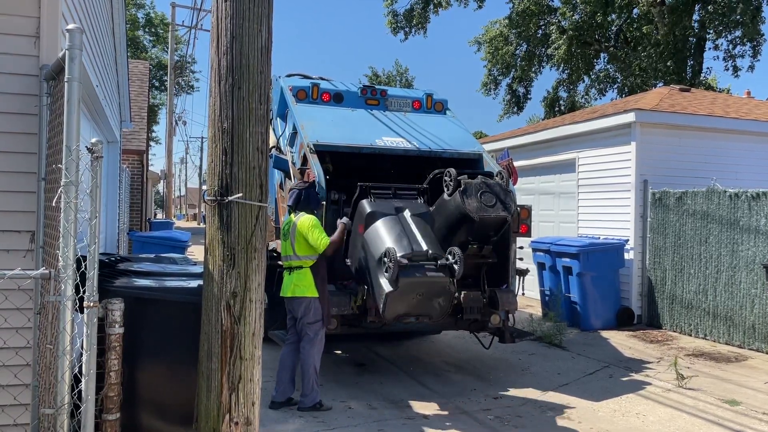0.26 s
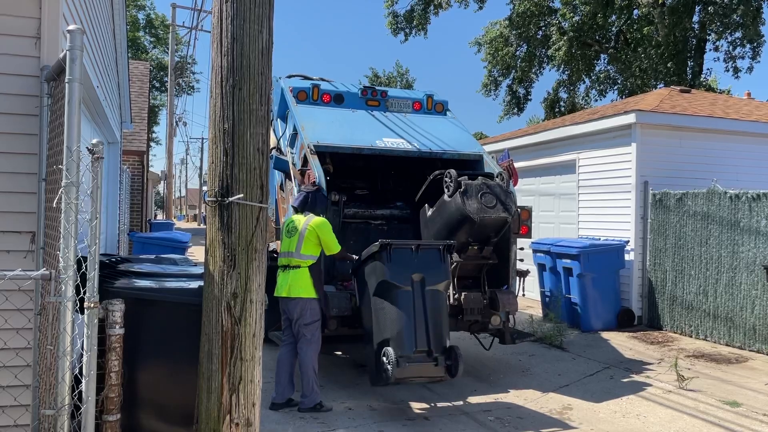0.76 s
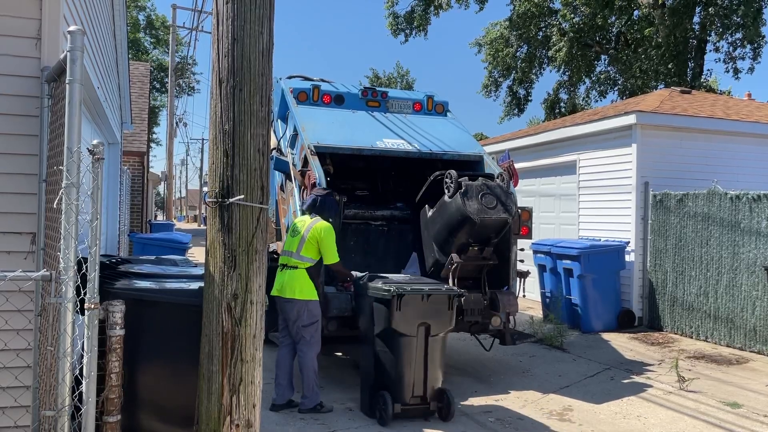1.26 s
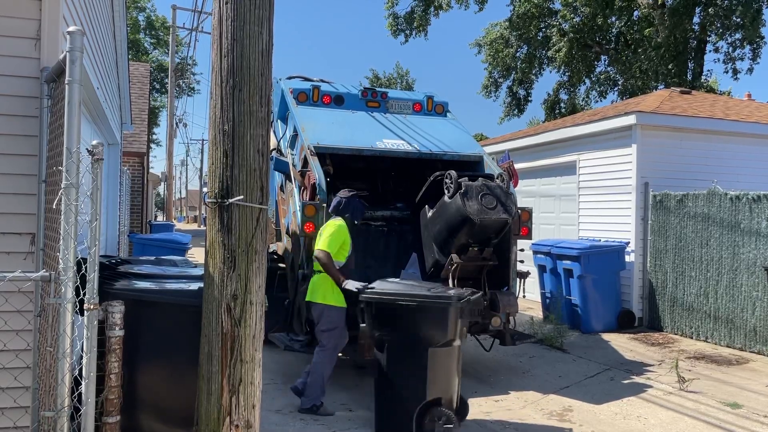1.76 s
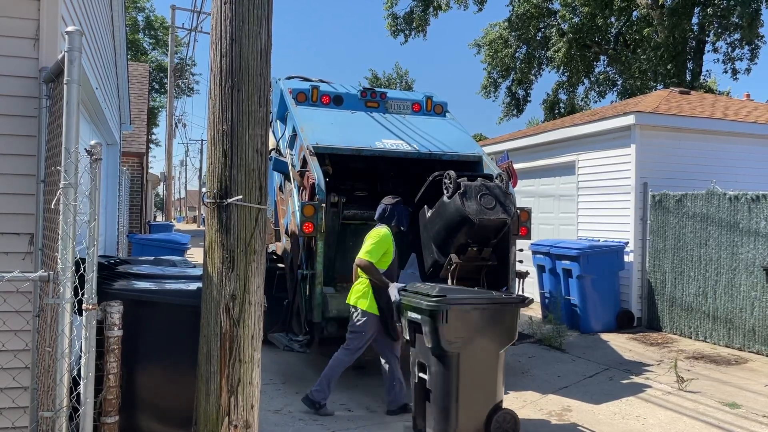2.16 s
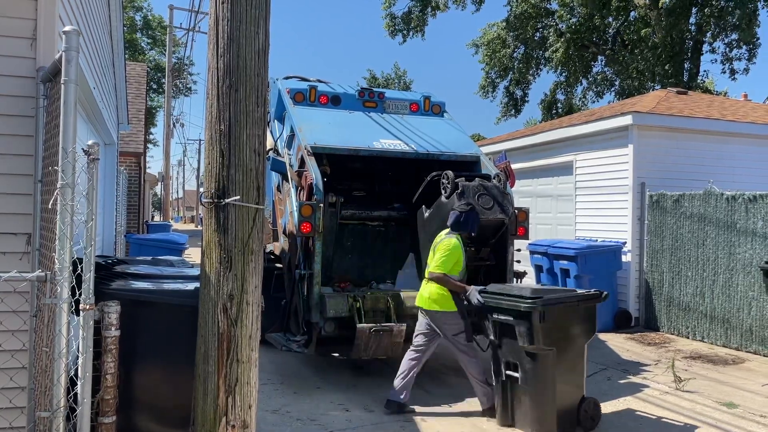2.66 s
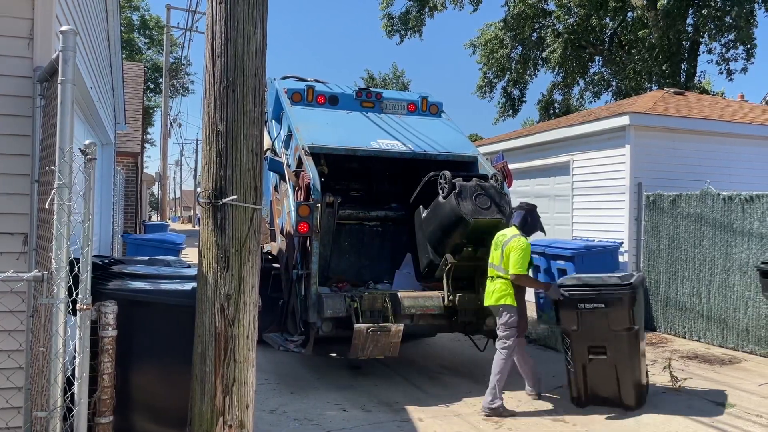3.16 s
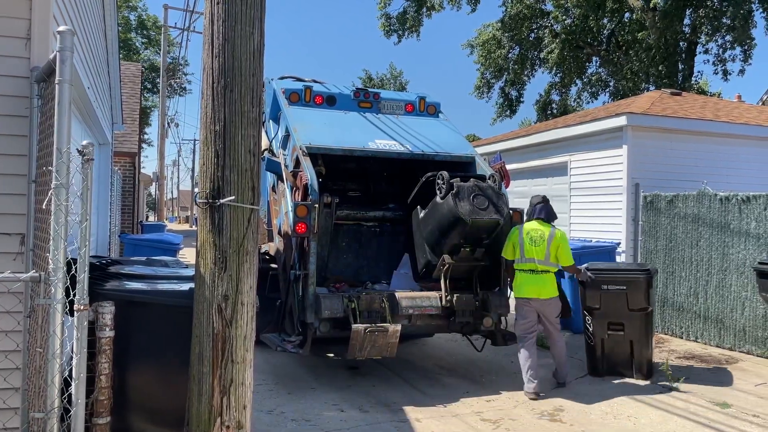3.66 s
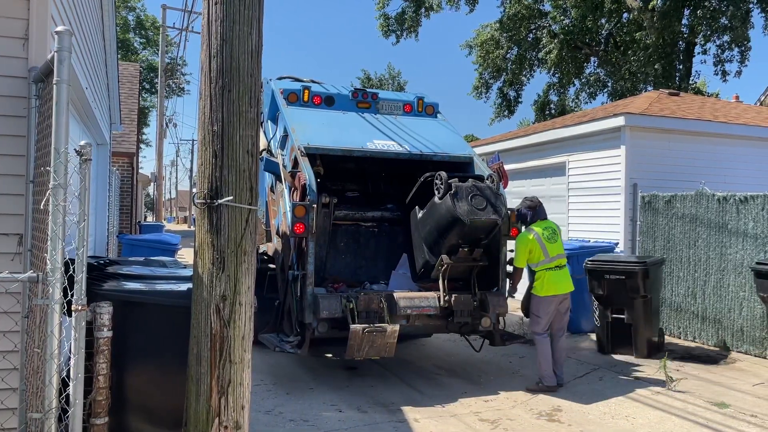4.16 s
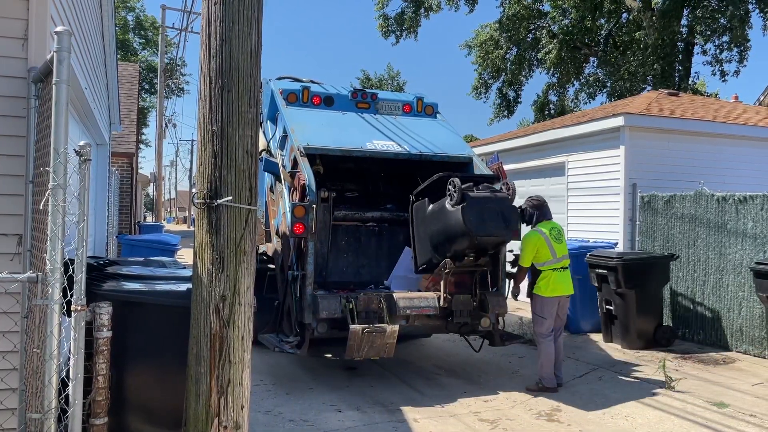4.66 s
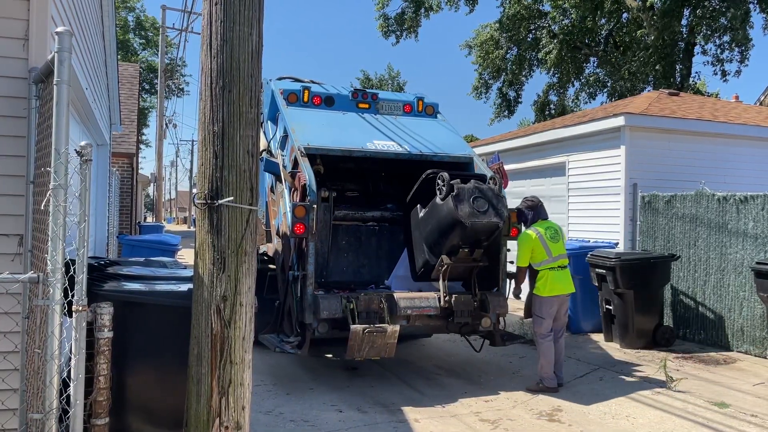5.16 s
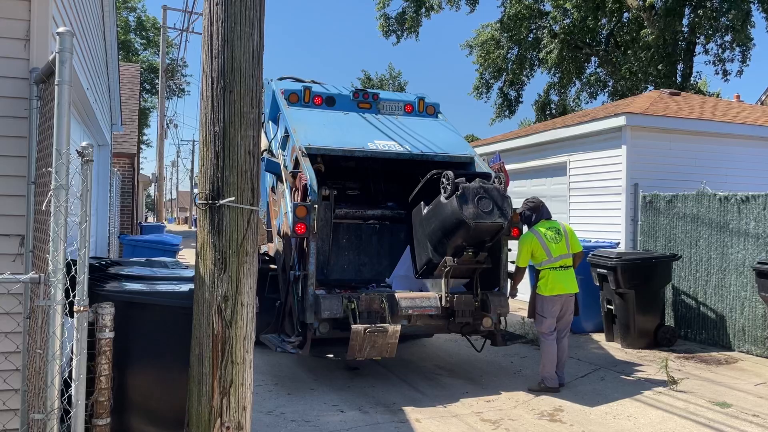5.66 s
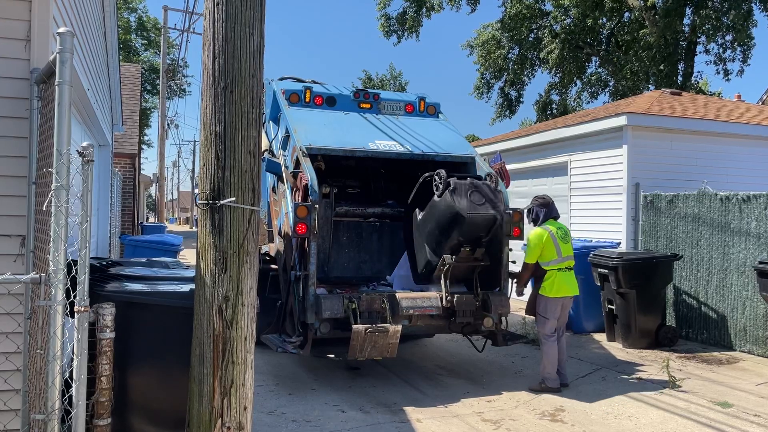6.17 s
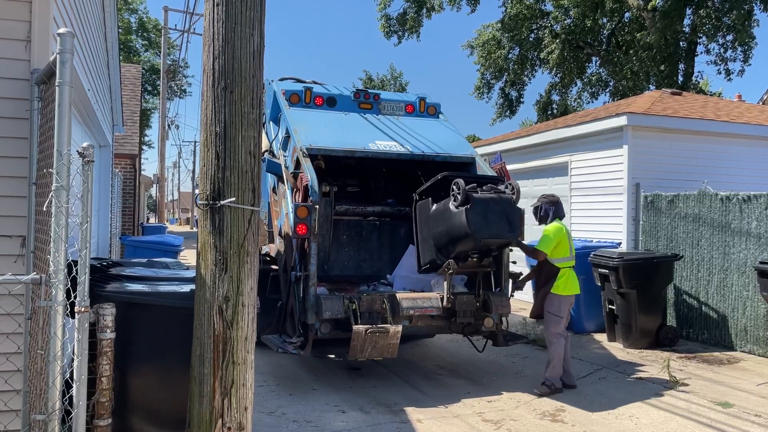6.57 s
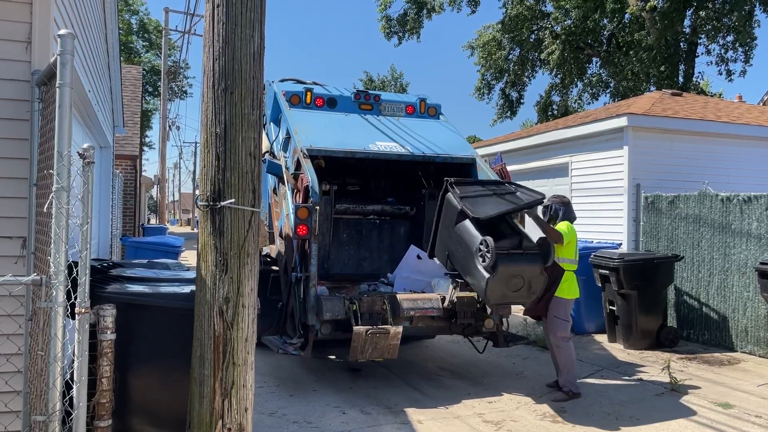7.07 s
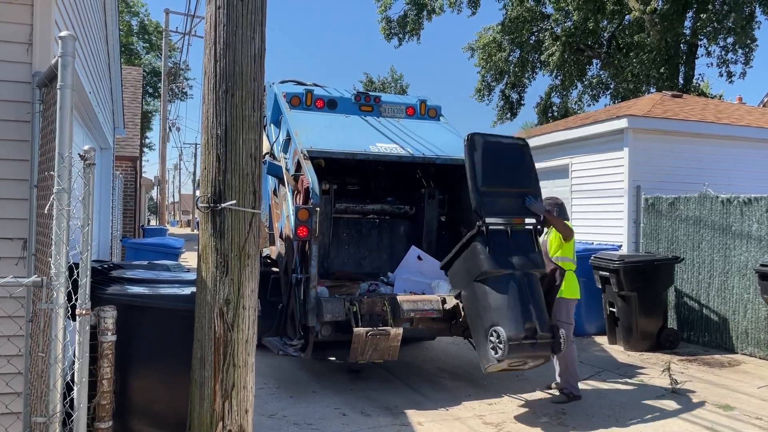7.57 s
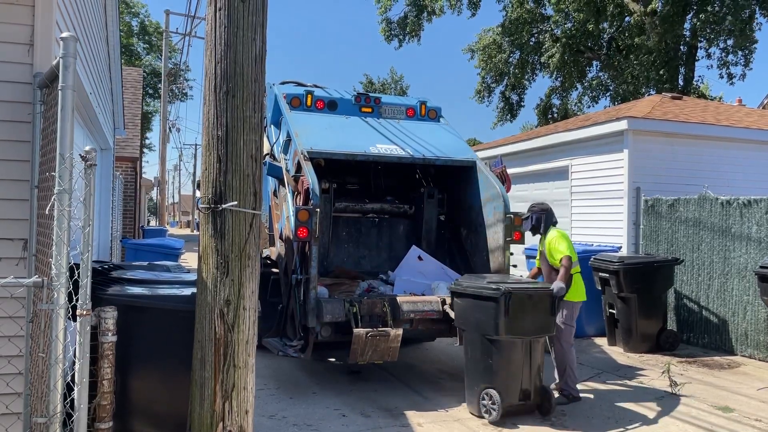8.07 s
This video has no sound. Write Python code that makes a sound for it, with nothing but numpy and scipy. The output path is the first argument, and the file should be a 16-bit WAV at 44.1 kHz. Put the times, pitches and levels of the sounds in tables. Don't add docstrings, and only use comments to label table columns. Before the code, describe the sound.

Outdoors between walls, a low puffing engine runs under oil hiss and a faint pump whine. Hollow tub knocks and a sharp clank come first, then wheels rumble, scrape and tick over rough ground with a thin hinge squeak. Denser metallic banging and booming thumps follow as another bin is shaken, then a brief lull, a low rising whine and a final double slam. Stereo microphone at moderate distance, slightly compressed on loud hits.

```python
import sys
import numpy as np
from scipy import signal
from scipy.fft import rfft, irfft, next_fast_len
from scipy.io import wavfile
from scipy.ndimage import uniform_filter1d

SR = 44100
rng = np.random.default_rng(int(sys.argv[2]) if len(sys.argv) > 2 else 0)


def attenuation_scalar(level_db):
    decades = np.asarray(level_db, float) / 20
    return 10 ** decades


def wav_record(signal):
    frames = np.transpose(np.atleast_2d(signal))
    bounded = np.clip(frames, -1, 1)
    quanta = np.round(bounded * 32767).astype(np.int16)
    wavfile.write(sys.argv[1], SR, quanta)


N = 367000
TIME = np.arange(N) / SR


def evened(x):
    return x / np.sqrt(np.mean(x ** 2) + 1e-20)


def read(points, hz):
    f, value = np.transpose(points)
    return np.interp(np.log(hz + 1), np.log(f + 1), value)


def colour(x, points, closed=False):
    n = next_fast_len(x.shape[-1])
    hz = np.fft.rfftfreq(n, 1 / SR)
    inside = (hz > points[0][0]) & (hz < points[-1][0]) if closed else 1
    return irfft(rfft(x, n) * attenuation_scalar(read(points, hz)) * inside, n)[..., :x.shape[-1]]


def resonate(x, hz, width):
    r = np.exp(-np.pi * width / SR)
    return 2 * signal.lfilter([1 - r], [1, -r * np.exp(2j * np.pi * hz / SR)], x).real


def body(x, modes):
    return sum(attenuation_scalar(db) * resonate(resonate(x, hz, width), hz, width) for hz, width, db in modes)


def lumps(seconds, depth_db):
    size = max(int(seconds * SR), 2)
    slow = uniform_filter1d(uniform_filter1d(rng.standard_normal(N), size), size)
    return attenuation_scalar(depth_db * evened(slow))


def patchy(x, depth_db):
    hz, t, z = signal.stft(x, SR, nperseg=512)
    patches = uniform_filter1d(rng.standard_normal(z.shape), size=5, axis=0)
    patches = uniform_filter1d(patches, size=6, axis=1)
    return signal.istft(z * attenuation_scalar(depth_db * evened(patches)), SR, nperseg=512)[1][:N]


def curve(rows):
    s, *columns = np.transpose(rows)
    return [np.interp(TIME, s, c) for c in columns]


def knocking(per_s, spread_db, fall, length):
    hits = attenuation_scalar(spread_db * np.minimum(rng.exponential(1, N), 5)) * (rng.random(N) < per_s / SR)
    return evened(signal.oaconvolve(hits, np.exp(-TIME[:length] / fall))[:N])


def rattle(per_s, spread_db, fall, steady):
    return (steady + knocking(per_s, spread_db, fall, 900)) * rng.standard_normal(N)


def blows(s, db, t60, rise):
    out, t = np.zeros(N + SR), TIME[:SR // 3]
    for at, level_db, fall in zip(s, db, np.clip(t60, .008, .8)):
        slower = attenuation_scalar(0.56 * (np.max(db) - level_db))
        front = 1 - np.exp(-t / (rise * slower))
        out[round(at * SR):][:len(t)] += attenuation_scalar(level_db - 60 * t / fall) * front
    return out[:N]


# [t/s, roar level/dB]
LOAD = [(0.0, -17), (0.12, -29), (0.35, -34), (1.0, -33), (1.3, -44), (1.5, -30.5), (1.65, -29.5),
        (2.0, -42), (2.45, -35), (3.26, -31), (4.0, -37.5), (4.66, -22.5), (5.0, -34), (5.17, -23.5),
        (5.45, -34), (6.28, -21.5), (6.8, -29.5), (8.32, -31.5)]
# [t/s, length/s, hiss level/dB, fizz level/dB re hiss]
SLIDES = [(1.35, 0.28, -40.5, -11), (1.48, 0.66, -39.5, -13), (2.54, 0.34, -36.5, -11),
          (3.708, 0.65, -35, -13.5), (4.144, 0.36, -32, -7), (4.552, 0.34, -34.5, -9),
          (4.958, 0.29, -28.5, -8), (5.1, 0.38, -33, -9), (8.203, 0.3, -38.5, -4.5), (6.33, 2.7, -38.5, -8),
          (2.33, .3, -45, -6), (5.7, 0.7, -42, -18), (3.358, 0.16, -45, -15)]


def rush(idle_db, share):
    idle_roar_db, hiss_per_load = -38.5, 0.16
    rise, fall = 0.085, 0.37
    power = attenuation_scalar(2 * (idle_db + hiss_per_load * (curve(LOAD)[0] - idle_roar_db)))
    for s, length, db, fizz_db in SLIDES:
        u = (TIME - s) / length
        shape = np.clip(np.minimum(u / rise, (1 - u) / fall), 0, 1)
        power = power + attenuation_scalar(2 * (db + share * fizz_db)) * shape ** 2
    return np.sqrt(power)


IDLE_HISS_DB, IDLE_FIZZ_DB = -40, -51.5
# [f/Hz, level/dB per Hz]
ROAR = [(30, -24), (60, 14.5), (85, 8), (125, -11.5), (220, -7.5), (450, 1.5), (560, -12.5), (740, -9.5),
        (900, -1.5), (1050, -1.5), (1300, -15), (2000, -24)]
# [f/Hz, level/dB per Hz]
HISS = [(1100, -42), (1350, -6), (1500, 0), (1750, -1), (2200, -0.5), (3300, -1.5), (4300, -3.5),
        (5000, -7.5), (5700, -12), (6400, -7), (7200, -9.5), (8200, -49)]
# [f/Hz, level/dB per Hz]
FIZZ = [(6500, -26), (8000, 2), (9500, 5), (12000, 7), (14400, 8), (15000, 6.5), (15400, -3), (15800, -14)]


def truck():
    firing_hz = 37.1
    roar_db, = curve(LOAD)
    turns = np.cumsum(firing_hz * lumps(0.023, 0.29)) / SR
    knock = np.exp(-(turns % 1))
    a, b, c = rng.standard_normal((3, N))
    grit = knocking(900, 1.0, 0.0076, 600)
    roar = a * (0.8 + knock) * lumps(0.022, 2.86)
    hiss = patchy(b, 2.16) * (3.4 + 0.3 * knock + 0.11 * grit) * lumps(0.032, 1.0)
    fizz = patchy(c, 2.2) * (1.7 + .3 * grit) * lumps(0.012, 1.2)
    out = attenuation_scalar(roar_db + 2.0) * evened(colour(roar, ROAR, True))
    out += rush(IDLE_HISS_DB, 0) * evened(colour(hiss, HISS, True))
    return out + rush(IDLE_FIZZ_DB, 0.99) * evened(colour(fizz, FIZZ, True))


# [f/Hz, width/Hz, level/dB riding on the hiss]
WHINE = [(996, 132, -37), (2800, 140, -54.5), (3230, 26, -52.5), (3720, 57, -51.5)]


def whine():
    level = rush(IDLE_HISS_DB, 0) * attenuation_scalar(58.5) * lumps(0.24, 0.95)
    return level * body(rng.standard_normal(N), WHINE)


# [t/s, hollow drum level/dB, weight on the wheels as boom level/dB re drum]
CART = [(0.3, -34, 6), (.75, -33.5, -1), (1.06, -37.5, 12), (1.12, -18, -4), (1.5, -26.5, 3),
        (1.86, -22, 2), (2.04, -34, 10.5), (2.42, -17, -1.5), (3.0, -19.5, -3), (4.0, -18, -11),
        (4.5, -22.5, 4.5), (5.36, -19.5, -5), (5.46, -30.5, 1), (5.58, -27, 2.5), (6.2, -19, 0.5),
        (7.05, -33.5, -13), (7.4, -26.5, -3), (7.72, -36.5, -21), (8.0, -22.5, 4.5)]
# [f/Hz, level/dB]
BOOM = [(13, -44), (22, 6), (36, 14), (59, 12.5), (75, 13.5), (102, 9.5), (150, 2.5), (200, -8),
        (330, -120)]
# [f/Hz, level/dB]
DRUM = [(71, -5.5), (120, -4.5), (158, -1), (193, -2), (221, -2.5), (255, -5.5), (330, -4.5), (470, -8),
        (611, -17), (800, -18.5), (1040, -19), (1760, -120)]
# [f/Hz, width/Hz, level/dB]
SHELL = [(780, 650, 2.5), (865, 180, 3.5), (985, 247, 13.5), (1105, 116, 11.5)]
# [f/Hz, width/Hz, level/dB]
STEEL = [(1523, 110, 4), (1874, 460, -1.5), (2280, 130, -6), (2830, 140, -7), (3320, 860, 2.5)]


def rolling():
    drum_db, weight_db = curve(CART)
    a, b = rng.standard_normal((2, N))
    boom = evened(colour(a, BOOM, True) * lumps(0.04, 2.3))
    drum = evened(colour(b, DRUM, True) * lumps(0.031, 2.3))
    chatter = rattle(160, 2.9, 0.0051, 0.15)
    lid = attenuation_scalar(-12.0) * evened(body(chatter, SHELL))
    axle = attenuation_scalar(-20) * evened(body(chatter, STEEL[:3]))
    return attenuation_scalar(drum_db + weight_db) * boom + attenuation_scalar(drum_db) * (drum + lid + axle)


# [t/s, crack peak level/dB, drum level/dB re crack,
# shell level/dB re crack, t60/s]
CLANKS = [(0.008, -32.5, 16.5, 10.5, 0.33), (0.188, -37, -15.5, -2, 0.041), (0.24, -37, 15, 20, 0.075),
          (1.0812, -14.5, 9, 5.5, 0.11), (1.735, -27.5, 5, 1.5, 0.6), (1.916, -33.5, 5, 3.5, 0.36),
          (2.2283, -9.5, 6.5, -3, 0.068), (2.292, -30.5, 22.5, 13, 0.15), (2.402, -26, 10, 1, 0.062),
          (2.605, -23, -15, -3, 0.29), (2.717, -23, -12, -13, 0.13), (2.891, -22.5, 5, -2, 0.047),
          (2.9776, -32.5, -5, 16.5, 0.033), (3.113, -20, -5, -11, 0.061), (3.285, -27.5, 9, -22, 0.14),
          (3.4004, -21, 7.5, 0, 0.3), (3.621, -16.5, 2, 1, 0.13), (3.683, -16, 7.5, -7, 0.12),
          (3.7953, -10.5, 1, -2, 0.11), (3.9256, -22.5, 8.5, 4.5, 0.16),
          (4.218, -18, 6.5, -6, 0.19), (4.4598, -12.5, 6.5, -3.5, 0.16), (4.483, -15, -20, -1, 0.14),
          (4.5935, -17.5, 2.5, -5.5, 0.42), (4.687, -11.5, 1, -3, 0.11), (4.975, -28, 17, 8.5, 0.25),
          (5.046, -19.5, -33, -8, 0.27), (5.538, -18, 1, -11, 0.13), (5.6348, -14.5, 3.5, -1, 0.058),
          (5.691, -12.5, -14, -7, 0.032), (5.8162, -11, -2, -3, 0.1), (5.854, -17, 6, -32, 0.11),
          (6.1174, -7.5, -6.5, -2.5, 0.1), (6.186, -17.5, 9, 5, 0.08), (6.303, -21, 3, -12, 0.61),
          (6.373, -12.5, -2, -10, 0.14), (6.578, -14.5, 2, -10, 0.086), (6.625, -19, 1.5, -17, 0.2),
          (7.899, -9.5, -2, -4.5, 0.11), (8.024, -10, 9, 0.5, 0.084), (8.243, -29, 10, 6.5, 0.17),
          (8.31, -27, -10, 1, 0.15)]
# [f/Hz, width/Hz, level/dB]
TUB = [(160, 24, -1), (214.7, 97, 10.5), (314.3, 135, 5.5), (380, 121, 7.5), (455.6, 69, 4.5),
       (520, 108, -2), (630, 340, -5)]
# [f/Hz, width/Hz, level/dB]
LATCH = [(3560, 400, -4), (3990, 1030, 1), (4450, 910, 1), (4960, 440, -4), (6360, 820, 4),
         (6810, 300, -2.5)]
# [f/Hz, level/dB]
CRACK = [(1200, -2), (1600, -0.5), (2500, -4.5), (3300, -11.5), (4200, -7.5)]


def clanks():
    s, db, drum_db, shell_db, t60 = np.transpose(CLANKS)
    coarse, fine = rattle(500, 1.1, .002, 2.2), rattle(810, 2.8, 0.0012, 0.9)
    latch_db = 0.9 * db - 13
    out = body(coarse * blows(s, db + drum_db + 2.5, 2.31 * t60, 0.0021), TUB)
    out += body(fine * blows(s, db + shell_db - 0.5, 1.2 * t60, 0.00045), SHELL)
    out += body(fine * blows(s, db - 4.5, 0.89 * t60, 0.0018), STEEL)
    out += body(fine * blows(s, latch_db, 1.39 * t60, 0.00093), LATCH)
    crack = evened(colour(rng.standard_normal(N), CRACK, True))
    slow, quick = blows(s, db - 12.5, 1.94 * t60, 0.012), blows(s, db - 5, 0.55 * t60, 0.00051)
    return out + crack * (slow + quick)


# [t/s, peak level/dB, f/Hz, t60/s]
PARTS = [(0.012, -14, 876, 0.22), (6.306, -16, 1050, 0.071), (3.81, -26, 3020, 0.17),
         (1.125, -23, 606, 0.69), (2.229, -21.5, 4300, 0.063), (2.245, -19, 690, 0.26),
         (2.27, -19, 1120, .3), (2.605, -26, 3220, 0.1), (2.719, -35, 3460, 0.36), (2.72, -32, 2250, 0.24),
         (3.405, -25, 4600, 0.14), (3.62, -15, 3500, 0.095), (3.685, -24.5, 6500, 0.11),
         (3.796, -21, 4200, .1), (3.796, -17, 2830, .1), (3.93, -18, 985, 0.17), (4.461, -26, 3830, .1),
         (4.488, -24, 1300, 0.16), (4.6, -17, 1080, .3), (4.69, -16.5, 1400, 0.25),
         (5.047, -26, 3680, 0.16), (5.693, -24, 2830, 0.063), (5.817, -9, 1096, 0.073),
         (5.82, -24.5, 3700, 0.3), (5.856, -25, 2870, 0.14), (6.119, -17, 3690, 0.16),
         (6.119, -16, 4160, 0.087), (6.378, -21, 2720, 0.26), (6.385, -22.5, 3700, 0.23),
         (7.881, -21, 1410, .3), (7.902, -31, 3770, .1), (7.902, -28, 2960, 0.16), (8.06, -18, 420, 0.29),
         (8.252, -20, 397, 0.21), (0.03, -11, 428, 0.28), (0.02, -17.5, 603, 0.23), (8.004, -27, 1600, .15),
         (4.6, -20.5, 2390, 0.19), (4.645, -22, 1060, .2), (5.645, -23, 306, 0.1), (5.86, -18, 285, 0.18),
         (6.195, -25, 1090, 0.12), (0.25, -19.5, 680, 0.14), (8.07, -25, 1890, 0.2),
         (3.66, -7.5, 146, 0.33), (4.99, -11, 106, 0.33), (7.902, -18.5, 2300, 0.18),
         (8.025, -4, 1870, 0.039), (8.045, -23, 1500, 0.15), (8.25, -33, 1110, 0.12)]
# [t/s, peak level/dB, f/Hz of the part, t60/s]
NUDGES = [(1.3463, -25, 1400, 0.18), (1.4694, -27, 1610, 0.2), (1.5552, -16.5, 2000, 0.11),
          (1.6594, -28, 1320, 0.16), (1.7794, -23, 2040, 0.26), (1.81, -24, 1740, 0.23),
          (1.877, -24, 1560, 0.16), (1.9624, -30, 2383, 0.2), (2.1947, -24, 1910, 0.22),
          (2.575, -29, 1490, 0.18), (2.8546, -18, 2180, 0.12), (3.0704, -36, 1390, 0.15),
          (3.2201, -30, 1300, 0.1), (3.316, -18, 2150, 0.14), (3.8417, -20, 1530, 0.17),
          (4.002, -20, 1600, 0.21), (4.0193, -20, 1550, 0.13), (4.1165, -21, 2070, 0.28),
          (4.1999, -22.5, 1550, 0.07), (4.3894, -26, 1620, 0.16), (4.4318, -25, 1990, 0.18),
          (4.8426, -17, 1570, 0.15), (5.7608, -31, 1900, 0.23), (5.7775, -20.5, 1550, 0.2),
          (6.005, -17, 1450, 0.23), (6.0217, -22, 1340, 0.2), (6.0606, -16, 1580, 0.15),
          (6.355, -22, 1550, 0.2), (7.3776, -33, 2120, 0.16), (8.056, -22, 1570, 0.12),
          (8.0836, -28, 1590, 0.15)]


def scrapes(rows, share, rise, broad_db):
    out, t = np.zeros(N + SR), TIME[:SR // 4]
    for (s, db, hz, t60), rub in zip(rows, rng.standard_normal(size=(50, len(t)))):
        ring = evened(body(rub, [(hz, share * hz, 0)]))
        ring += attenuation_scalar(broad_db) * evened(colour(rub, CRACK, True))
        out[round(s * SR):][:len(t)] += attenuation_scalar(db - 60 * t / t60) * (1 - np.exp(-t / rise)) * ring
    return out[:N]


# [t/s, peak level/dB]
SNAPS = [(0.012, -9.5), (0.189, -16.5), (2.719, -10), (3.22, -7), (3.428, -12), (3.691, -11), (4.689, -9),
         (5.047, -10), (6.307, -12), (6.385, -8), (6.579, -16), (6.627, -12), (8.025, -7)]
# [f/Hz, width/Hz, level/dB]
EDGE = [(1050, 460, 8), (2300, 1400, -8), (4300, 2000, -18), (12500, 3300, -18)]


def snaps():
    s, db = np.transpose(SNAPS)
    clicks = np.zeros(N)
    clicks[np.round(s * SR).astype(int)] = attenuation_scalar(db + 21)
    clicks[np.round((s + .0037) * SR).astype(int)] = -attenuation_scalar(db + 17)
    return body(clicks, EDGE)


# [t/s, peak level/dB, f/Hz]
THUMPS = [(0.077, -8.5, 95.8), (1.079, -8, 222), (1.352, -11, 68.7), (1.544, -13, 69), (1.89, -14, 74),
          (2.23, -7.5, 142), (3.421, -8, 150), (3.629, -1.5, 228.5), (4.264, -7, 64), (4.459, -9, 141),
          (4.473, -4.5, 61.4), (4.691, -5.5, 53.5), (5, -5, 73), (5.63, -10, 75), (5.852, -6, 83.4),
          (6.139, -5, 73.4), (6.19, -5.5, 208), (6.584, -9, 57.5), (6.84, -14, 73), (7.401, -18, 147),
          (7.911, -17, 150), (8.021, -3.5, 309), (8.11, -31, 62), (8.248, -9, 104.5),
          (0.044, -9.5, 349), (0.027, -16.5, 140), (2.229, -5, 366), (2.261, -1.5, 356), (2.304, -6, 465),
          (3.624, -6, 298), (4.463, -10, 391), (7.904, -8.5, 291), (8.028, -7, 354), (8.254, -11, 380)]


def thumps():
    out, t = np.zeros(N + SR), TIME[:SR // 2]
    for s, db, hz in THUMPS:
        phase = rng.random(2)
        t60 = 0.2 * (100 / hz) ** 0.4
        sag = 1 + 0.37 * np.exp(-t / 0.012)
        swing = np.sin(2 * np.pi * (hz * t * sag + phase[0]))
        swing += 0.3 * np.sin(2 * np.pi * (1.55 * hz * t + phase[1]))
        envelope = attenuation_scalar(db + 1.5 - 60 * t / t60) * (1 - np.exp(-t / 0.0039))
        out[round(s * SR):][:len(t)] += envelope * swing
    return out[:N]


# [t/s, peak level/dB, f/Hz,
# t60/s]
PINGS = [
    (0.0374, -16, 3440, 0.043),
    (3.798, -18, 5180, 0.039),
    (3.7965, -12, 2060, 0.06),
    (4.485, -7, 1588, 0.076),
    (5.819, -9, 1474, 0.059),
    (6.118, -5, 1543, 0.075),
    (7.9, -6.5, 1470, 0.068),
         (1.083, -14, 1130, .1),
    (7.904, -14, 1150, .08),
    (.247, -17, 1030, .12),
    (.187, -20, 1000, .07),
    (.188, -26, 1500, .06),
]


def pings():
    out, t = np.zeros(N + SR), TIME[:SR // 4]
    for s, db, hz, t60 in PINGS:
        phase = rng.random(2)
        pair = np.sin(2 * np.pi * (hz * t + phase[0]))
        pair += 0.42 * np.sin(2 * np.pi * (1.03 * hz * t + phase[1]))
        envelope = attenuation_scalar(db - 1.5 - 60 * t / t60) * (1 - np.exp(-t / 0.00059))
        out[round(s * SR):][:len(t)] += envelope * pair
    return out[:N]


# [t/s, tooth rate f/Hz, level/dB]
PUMP = [
    [(0.2, 218.3, -33.5), (1.07, 214.7, -36)],
    [(1.6, 210.7, -29), (2.2, 216.5, -31.5)],
    [(7.15, 151, -50), (7.9, 150.4, -30)],
]
# [multiple of the tooth rate, level/dB]
PUMP_ORDERS = [
    [(1, 4.5), (2, -23)],
    [(1, -1), (2, -10)],
    [(1, -11.5), (2, -4.5), (3, -9)],
]


def pump():
    out = np.zeros(N)
    for rows, orders in zip(PUMP, PUMP_ORDERS):
        hz, db = curve(rows)
        on = uniform_filter1d(1. * (TIME > rows[0][0]) * (TIME < rows[-1][0]), size=1500)
        turns = np.cumsum(hz) / SR
        for k, order_db in orders:
            line = np.sqrt(2) * np.sin(2 * np.pi * k * turns)
            out += on * attenuation_scalar(db + order_db) * lumps(0.024, 0.47) * line
    return out


# [t/s, peak level/dB, t60/s]
TICKS = [(1.082, -25.5, 0.038), (1.4631, -32, 0.06), (1.6342, -34, 0.07), (1.9185, -38, 0.07),
         (2.129, -36, 0.19), (2.2288, -30, 0.041), (2.582, -35, 0.07), (2.605, -27, 0.07),
         (2.718, -21.5, 0.048), (3.0786, -34, 0.07), (3.1073, -34, 0.07), (3.4032, -30.5, 0.07),
         (3.6212, -28, 0.091), (3.6885, -24.5, 0.058), (3.7953, -27, 0.056), (4.2074, -31, 0.07),
         (4.4598, -26, 0.07), (4.588, -24, 0.22), (5.045, -24, 0.093), (5.5338, -29.5, 0.069),
         (5.689, -32, 0.079), (5.8182, -30, 0.084), (6.118, -25.5, 0.062), (6.348, -37, 0.11),
         (6.3729, -26, 0.076), (6.6313, -29, 0.07), (7.8994, -28, 0.078), (8.0242, -32, 0.057)]
# [t/s, peak level/dB]
SPECKS = [(1.7814, -33), (1.8672, -35), (1.9639, -32), (2.4364, -35), (2.5581, -31), (2.6524, -33),
          (2.7756, -37), (2.8928, -34), (4.1165, -31), (4.1929, -36), (4.4902, -26), (4.6857, -32),
          (5.0938, -27), (6.304, -29), (6.5969, -33), (8.2492, -40)]


def ticks():
    specks = [(at, level_db, .04) for at, level_db in SPECKS]
    s, db, t60 = np.transpose(TICKS + specks)
    spit = blows(s, db - 2, 0.23 * t60, 0.0001)
    spit += blows(s, db - 9, 1.6 * t60, 0.0002)
    spit += blows(s, db - 17.0, 3.0 * t60, 0.0033)
    spit = uniform_filter1d(spit, int(0.0006 * SR))
    return evened(colour(rng.standard_normal(N), FIZZ, True)) * spit


# [t/s, length/s, level/dB, f/Hz]
HINGE = [
    (3.37, .135, -35, 3240),
    (3.93, .09, -37, 3250),
    (4.03, .07, -39, 3250),
    (4.592, .03, -33, 14400),
    (4.6, .05, -42, 14400),
]


def hinge():
    out = np.zeros(N)
    for s, length, db, hz in HINGE:
        u = np.clip((TIME - s) / length, 0, 1)
        swell = np.sqrt(np.sin(np.pi * u) + 1e-12)
        flutter = 1 + .45 * np.sin(2 * np.pi * 31 * TIME)
        waver = 0.74 * np.sin(2 * np.pi * 23 * TIME)
        out += attenuation_scalar(db) * swell * flutter * np.sin(2 * np.pi * hz * TIME + waver)
    return out


# [t/s, peak level/dB, start f/Hz, end f/Hz, glide/s, t60/s]
SWOOP = (6.889, -3, 240, 52, .009, .11)


def swoop():
    s, db, from_hz, to_hz, glide, t60 = SWOOP
    t = np.maximum(TIME - s, 0)
    hz = to_hz + (from_hz - to_hz) * np.exp(-t / glide)
    turns = np.cumsum(hz * (t > 0)) / SR
    return attenuation_scalar(db - 60 * t / t60) * (1 - np.exp(-t / 0.0031)) * np.sin(2 * np.pi * turns)


# [f/Hz, t60/s]
ALLEY = [(60, 0.23), (300, 0.14), (1000, 0.28), (3000, 0.28), (10000, 0.081)]


def alley(x):
    taps = np.zeros((2, SR // 2))
    at = np.arange(60, SR // 2 - 20, 20)
    at = at + rng.integers(0, 20, (2, len(at)))
    np.put_along_axis(taps, at, rng.choice([-1., 1.], at.shape), 1)
    hz, t, z = signal.stft(taps, SR, nperseg=256)
    t60 = read(ALLEY, hz)[:, None]
    tail = signal.istft(z * attenuation_scalar(-60 * t / t60) / np.sqrt(t60), SR, nperseg=256)[1]
    return signal.fftconvolve(x[None], tail / np.linalg.norm(tail[0]), axes=1)[:, :N]


# [f/Hz, level/dB]
BASS = [(15, 0), (300, 0), (450, -30)]
# [f/Hz, level/dB]
LEAN = [(350, -30), (450, 0), (700, 0), (900, -25)]


def scene():
    direct = truck() + whine() + pump() + rolling() + clanks() + pings()
    direct += thumps() + swoop() + ticks() + snaps() + hinge()
    direct += attenuation_scalar(-11.5) * scrapes(NUDGES, 0.23, 0.0048, 0.5)
    direct += attenuation_scalar(-2.5) * scrapes(PARTS, 0.12, 0.0007, -21)
    front, walls = alley(direct)
    both = direct + attenuation_scalar(-10.0) * front
    lead = -signal.hilbert(both, next_fast_len(N))[:N].imag
    across = .42 * lead - .3 * colour(both, BASS) + .15 * colour(both, LEAN, True)
    across += .9 * walls - .5 * colour(walls, BASS)
    return np.array([both + across, both - across])


def roll_off(x):
    return signal.sosfilt(signal.butter(12, 15790, fs=SR, output="sos"), x)


# [f/Hz, level/dB]
SUM_PORT = [(18, -25), (30, -21), (39, -24), (45, 4), (62, -0.5), (7000, -2.5), (7700, -3.5), (8600, -18),
            (9100, -14), (9600, -7), (10400, -2.5)]
# [f/Hz, level/dB]
DIFF_PORT = [(40, -8), (80, -9), (150, -8), (350, -9), (700, -4), (1400, -8), (3000, -3), (5500, -4.5),
             (6800, -3.5), (8500, 9), (10500, 1), (11800, -4), (12400, -16), (13000, -17.5)]


def record(dry):
    mid = colour((dry[0] + dry[1]) / 2, SUM_PORT)
    side = colour((dry[0] - dry[1]) / 2, DIFF_PORT)
    x = np.array([mid + side, mid - side])
    duck_from_db, duck_share, lag_s = -19.5, 0.6, 0.099
    r = np.exp(-1 / (lag_s * SR))
    power = signal.lfilter([1 - r], [1, -r], mid ** 2)
    power = signal.lfilter([1 - r], [1, -r], power)
    over_db = np.maximum(10 * np.log10(power + 1e-9) - duck_from_db, 0)
    x = x / attenuation_scalar(duck_share * over_db)
    return roll_off(.97 * np.tanh(x / .97))


dry = scene()
out = record(dry)
wav_record(out)
```